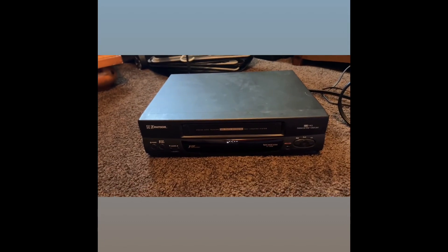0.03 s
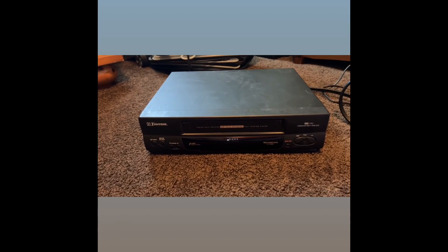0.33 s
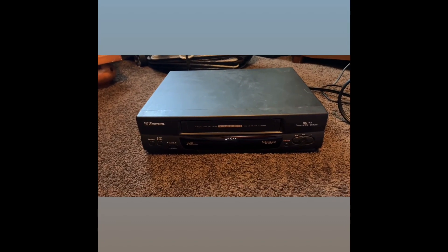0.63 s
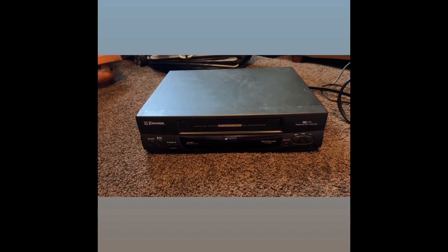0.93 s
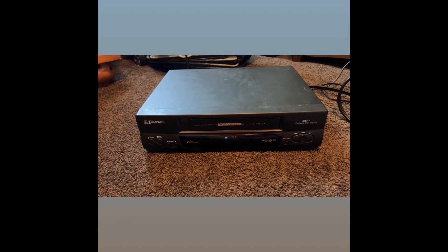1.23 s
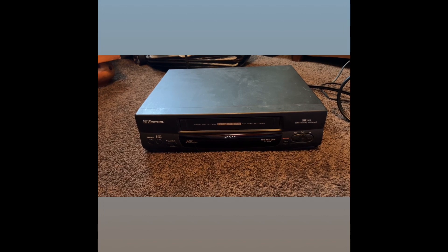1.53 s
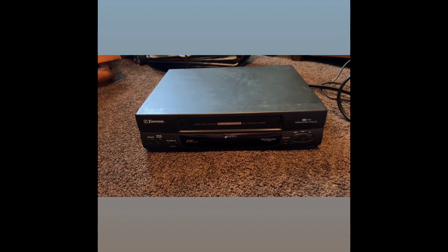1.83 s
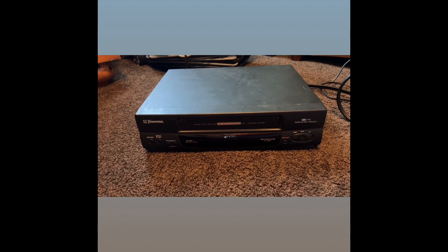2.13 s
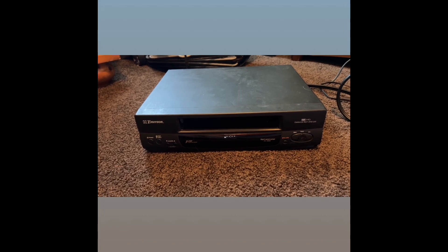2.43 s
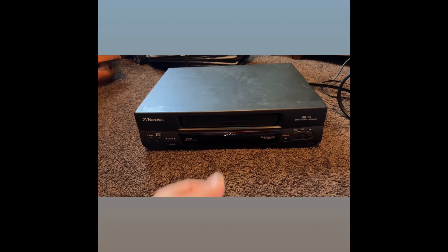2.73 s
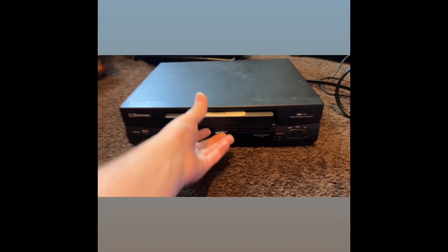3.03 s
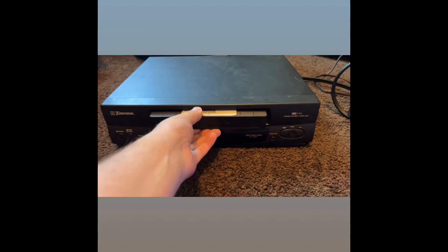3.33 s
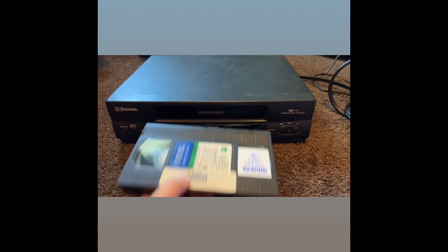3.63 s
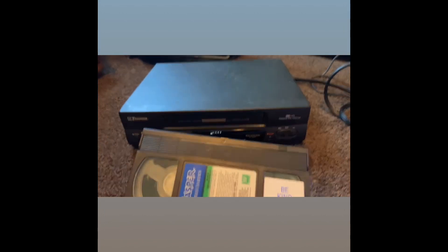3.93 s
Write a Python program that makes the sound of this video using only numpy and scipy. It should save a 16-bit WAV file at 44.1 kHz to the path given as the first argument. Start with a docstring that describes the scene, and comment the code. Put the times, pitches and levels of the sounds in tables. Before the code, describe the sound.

A video cassette recorder clacks and whirs, ejecting a tape that is pulled out by hand.

```python
"""A quiet room: a video cassette recorder on the carpet ejects its tape.
Levers clack through the chassis, the reel winds in the slack, a geared motor lifts the cassette
and pushes it out. A hand slides it from the slot with scrapes, knocks and one squeak; the flap
slaps shut and bounces. Mains hum, bearing whirr and a picture tube's whistle run throughout."""
import sys
import numpy as np
from scipy import signal
from scipy.fft import rfft, irfft
from scipy.io import wavfile

SR = 44100
rng = np.random.default_rng(int(sys.argv[2]) if len(sys.argv) > 2 else 0)


def output_pcm(signal):
    """Save a mono or channel-first signal as 16-bit PCM at the path in sys.argv[1].

    Samples are clipped to [-1, 1] before scaling.
    """
    pcm = np.clip(np.atleast_2d(signal).T, -1, 1) * 32767
    wavfile.write(sys.argv[1], SR, np.round(pcm).astype(np.int16))


N = 176400
TIME_S = np.arange(N) / SR

# Levels are relative; spectra give shape only.
# room and idling machine, noise spectrum: f/Hz, density/dB
AIR_SPECTRUM = [(44, -17.5), (122, -2), (147, -10), (247, -11), (281, -35), (328, -16.5), (415, -32.5),
                (978, -21), (2800, -43.5), (5880, -52), (12500, -56.5), (15000, -54)]
# picture tube whistle: t/s, level/dB
WHISTLE_ENVELOPE = [(0, -60), (1.6, -67.5), (2.9, -67.5), (3.6, -61), (4, -61)]
# bearing resonances: f/Hz, width/Hz, level/dB
WHIRR_MODES = [(233, 24, -74), (328, 75, -75.5), (1040, 225, -73.5), (1470, 760, -74.5)]
# gear noise under motor load: t/s, level/dB
GEAR_ENVELOPE = [(0, -65), (.22, -59.5), (.4, -57.5), (.52, -57.5), (.64, -69), (.72, -100), (1.95, -100),
                 (2.05, -65), (2.19, -64), (2.23, -58), (2.32, -56.5), (2.42, -44.5), (2.49, -53.5),
                 (2.6, -59), (2.72, -57), (2.91, -48), (2.96, -65), (3.02, -100)]
# gear noise spectrum: f/Hz, density/dB
GEAR_SPECTRUM = [(76, -27), (130, 5), (193, -0.5), (312, -1.5), (637, -3.5), (1030, -8.5), (1620, -18),
                 (4000, -18), (9000, -21.5), (15000, -24)]
# gear train resonances: f/Hz, boost/dB
GEAR_MODES = [(3210, 7), (4570, -7), (6330, -10), (7690, -4)]
# edges of the body, middle, crack and treble bands: f/Hz
CHATTER_EDGES_HZ = [150, 700, 2000, 6000, 14500]
# lever and carriage blows:
# t/s, thump/dB, body/dB, middle/dB, crack/dB, treble/dB, chatter T60/s, part f/Hz, part level/dB
LEVER_CLACKS = [(0.113, -65, -69, -59, -52.5, -55.5, 0.25, 3000, -60),
                (0.170, -62, -55.5, -61, -52.5, -49.5, 0.16, 5500, -52),
                (0.256, -64, -50, -51.5, -53, -50.5, 0.17, 2300, -49),
                (0.273, -68, -51, -52.5, -51.5, -58, 0.21, 3000, -63),
                (0.339, -62, -50, -49.5, -50.5, -61, 0.24, 1370, -73),
                (0.36, -63.5, -51, -50, -49, -59, 0.13, 1850, -53),
                (0.432, -75, -56.5, -54.5, -56.5, -66, 0.39, 3240, -70),
                (0.451, -68, -52.5, -52, -50, -57, 0.15, 3450, -67),
                (2.249, -75, -44.5, -46, -46, -50, 0.13, 5330, -45.5),
                (2.34, -73, -49, -49, -54, -76, 0.12, 1820, -58),
                (2.36, -63, -48, -62, -55, -60, 0.27, 2000, -56),
                (2.442, -58, -47.5, -50.5, -44, -39, 0.25, 5770, -42),
                (2.499, -55.5, -46.5, -42.5, -41, -41, 0.23, 2800, -44),
                (2.514, -58, -41.5, -40.5, -37.5, -41.5, 0.15, 2100, -33.5),
                (2.643, -58, -50.5, -48, -46.5, -52.5, 0.12, 3070, -44),
                (2.888, -66, -57, -56, -47.5, -50, 0.14, 4220, -61),
                (2.911, -55.5, -49, -55, -56, -56, 0.16, 3650, -68)]
# chassis and lid resonances: f/Hz, boost/dB
CHASSIS_MODES = [(190, 0.5), (395, 2), (520, -9.5), (820, 2.5), (935, -0.5), (1390, 2), (1880, 4),
                 (2330, -0.5), (2830, 6), (3380, 2), (5700, -4)]
# tape rubbing over the guides: t/s, level/dB
REEL_ENVELOPE = [(.6, -100), (.76, -76), (1.15, -86), (1.53, -83), (1.64, -68.5), (1.98, -71),
                 (2.15, -66.5), (2.9, -54), (3.0, -100)]
# tape friction spectrum: f/Hz, density/dB
TAPE_SPECTRUM = [(300, 17.5), (700, 4.5), (2500, 4.5), (7200, 4), (9000, -5), (14000, -6)]
# shell friction in slot and hand: t/s, level/dB
SCRAPE_ENVELOPE = [(3.02, -100), (3.055, -65.5), (3.13, -83), (3.335, -66), (3.4, -41), (3.435, -39.5),
                   (3.485, -45.5), (3.56, -38), (3.64, -48), (3.73, -47), (3.8, -55), (3.88, -66),
                   (4, -59.5)]
# shell friction spectrum: f/Hz, density/dB
SCRAPE_SPECTRUM = [(59, -9), (100, -7.5), (285, -8.5), (582, -1.5), (1190, -8.5), (1430, -8.5),
                   (2420, -10.5), (3840, -12.5), (15000, -22.5)]
# cassette and flap blows: columns of LEVER_CLACKS, then hollow f/Hz, hollow level/dB
SLOT_KNOCKS = [(3.154, -66, -60, -60, -66, -73, 0.052, 1390, -67.5, 390, -64),
               (3.168, -67, -59, -75, -64.5, -76, 0.19, 3030, -61, 225, -56),
               (3.441, -67, -55, -39, -42.5, -51, 0.051, 2950, -45.5, 613, -40),
               (3.542, -78, -46, -63, -46, -43, 0.23, 2560, -36.5, 517, -26.5),
               (3.587, -35.5, -29, -24, -27.5, -23, 0.097, 3900, -34, 567, -22),
               (3.598, -37.5, -34, -48, -28, -27.5, 0.11, 2200, -40, 401, -25.5),
               (3.671, -40.5, -40, -36, -35.5, -30.5, 0.14, 2480, -35, 451, -25.5)]
# cassette and flap resonances: f/Hz, boost/dB
CASSETTE_MODES = [(172, 4), (305, 3), (402, 5.5), (571, 0), (824, 3.5), (1380, 2), (2185, -2), (2840, 8.5),
                  (3340, 3.5), (3910, 2.5), (4300, -1), (8070, 1)]
# room decay: f/Hz, T60/s
ROOM_DECAY = [(100, 0.74), (1000, 0.39), (4000, 0.31), (12000, 0.4)]


def from_db(db):
    """Decibels to gain."""
    return 10 ** (np.asarray(db) / 20)


def unit_rms(x):
    """Scale to unit power."""
    return x / np.sqrt(np.mean(x ** 2) + 1e-20)


def envelope(points):
    """Gain over time from t/s, level/dB points."""
    return from_db(np.interp(TIME_S, *np.transpose(points)))


def at_hz(points, hz):
    """Read a table on a log-frequency axis."""
    points_hz, values = np.transpose(points)
    return np.interp(np.log(hz), np.log(points_hz), values)


def band(x, low_hz, high_hz):
    """Causal band-pass."""
    return signal.sosfilt(signal.butter(3, [low_hz, high_hz], "band", fs=SR, output="sos"), x)


def colour(x, spectrum):
    """Apply a spectrum, rolled off below its first point; unit power."""
    hz = np.maximum(np.arange(N // 2 + 1) * SR / N, 1)
    low_cut = 1 / np.sqrt(1 + (spectrum[0][0] / hz) ** 8)
    return unit_rms(irfft(rfft(x) * from_db(at_hz(spectrum, hz)) * low_cut, N))


def drift(rate_hz):
    """Random wander between unit-spread points."""
    return np.interp(TIME_S * rate_hz, np.arange(1000), rng.standard_normal(1000))


def grains(per_s, spread_db, size=N):
    """Tiny random contacts of uneven strength; unit power."""
    strength = from_db(spread_db * np.minimum(rng.exponential(1, size), 4)) * rng.choice([-1, 1], size)
    return unit_rms(strength * (rng.random(size) < per_s / SR))


def resonance(x, hz, width_hz):
    """Two-pole resonator, peak gain 1."""
    radius = np.exp(-np.pi * width_hz / SR)
    feedback = [1, -2 * radius * np.cos(2 * np.pi * hz / SR), radius ** 2]
    return signal.lfilter((1 - radius ** 2) / 2 * np.array([1, 0, -1]), feedback, x + 1e-18)


def ringing(x, modes, width_hz):
    """Direct sound plus a body's resonances."""
    return x + sum(from_db(db) * resonance(x, hz, width_hz) for hz, db in modes)


def damped_mode(t, hz, rise_s):
    """A mode that swells and dies within a few cycles."""
    return (t / rise_s * np.exp(1 - t / rise_s)) ** 2 * np.sin(2 * np.pi * hz * t)


def room_air():
    """Soft rumble of room and idling machine."""
    return from_db(-61.5) * colour(rng.standard_normal(N), AIR_SPECTRUM)


def mains_hum(hz=120.4, rms_db=-63):
    """One low tone, wavering slightly in level."""
    return np.sqrt(2) * from_db(rms_db + 0.94 * drift(6)) * np.sin(2 * np.pi * hz * TIME_S)


def tube_whistle(hz=15735, tremolo_hz=11.7, wander_db=1.5):
    """A thin, high picture tube whistle, with a tremolo added to its level."""
    tremolo = (1 + 0.54 * np.cos(2 * np.pi * tremolo_hz * TIME_S)) * from_db(wander_db * drift(9))
    tone = np.sqrt(2) * np.sin(2 * np.pi * hz * TIME_S + 0.6 * drift(22))
    return envelope(WHISTLE_ENVELOPE) * tremolo * tone


def bearing_whirr():
    """Spinning bearings keep a few broad resonances ringing."""
    whirr = 0
    for hz, width_hz, db in WHIRR_MODES:
        noise = resonance(rng.standard_normal(N), hz, width_hz)
        whirr += from_db(db) * unit_rms(resonance(noise, hz, width_hz))
    return whirr


def rattle(decay_s=0.0063):
    """Loose plastic catches in short random bursts; unit power."""
    catches = np.abs(grains(per_s=49, spread_db=3.6))
    bursts = signal.lfilter([1], [1, -np.exp(-1 / (decay_s * SR))], catches + 1e-18)
    return unit_rms(bursts * rng.standard_normal(N))


def gears(teeth_per_s=197, spread_db=6, rub_db=3.5):
    """Teeth tick and rub at the motor's wavering speed; the carriage rattles."""
    teeth = np.cumsum(teeth_per_s * (1 + 0.025 * drift(14))) / SR
    strength = from_db(spread_db * np.minimum(rng.standard_normal(N), 2))
    ticks = np.diff(np.floor(teeth), prepend=0) * strength
    mesh = unit_rms(unit_rms(ticks) + from_db(rub_db) * rng.standard_normal(N))
    train = ringing(mesh + from_db(-0.5) * rattle(), GEAR_MODES, width_hz=103)
    return envelope(GEAR_ENVELOPE) * colour(train, GEAR_SPECTRUM)


def blow(start_s, thump_db, body_db, middle_db, crack_db, treble_db, t60_s, part_hz, part_db):
    """Loose parts chatter, the struck part rings briefly, the case bounces on the carpet."""
    t = TIME_S[:SR // 2]
    attack_s = 0.00089 * (t60_s / 0.08) ** 1.62  # longer chatter builds more slowly
    chatter = grains(per_s=3500, spread_db=-0.5, size=len(t))
    chatter *= from_db(-60 * t / t60_s) * (1 - np.exp(-t / attack_s))
    zones = zip(CHATTER_EDGES_HZ, CHATTER_EDGES_HZ[1:], (body_db, middle_db, crack_db, treble_db))
    voices = [(band(chatter, low_hz, high_hz), db) for low_hz, high_hz, db in zones]
    strike = chatter * from_db(-60 * t / 0.069)
    voices.append((resonance(strike, part_hz, width_hz=280), part_db))
    onset = slice(int(0.025 * SR))
    clatter = sum(from_db(db) * voice / np.std(voice[onset]) for voice, db in voices)
    thump = from_db(thump_db + 13) * damped_mode(t, hz=96, rise_s=0.0074)
    out, start = np.zeros(N + SR), int(start_s * SR)
    out[start:start + len(t)] = clatter + thump
    return out[:N]


def mechanism():
    """Levers and gears sound through the chassis."""
    clacks = from_db(-2.5) * sum(blow(*row) for row in LEVER_CLACKS)
    return ringing(clacks + gears(), CHASSIS_MODES, width_hz=74)


def reel(whine_hz=7240, whine_db=-15.5):
    """Tape hisses over the guides; the reel motor whines."""
    whine = np.sin(2 * np.pi * np.cumsum(whine_hz * (1 + 0.001 * drift(69))) / SR)
    hiss = colour(rng.standard_normal(N), TAPE_SPECTRUM)
    return envelope(REEL_ENVELOPE) * (hiss + from_db(whine_db) * whine)


def shell_scrape():
    """The shell slides in many tiny slips and rattles against the guides."""
    friction = grains(per_s=3000, spread_db=1) + from_db(-5) * rattle()
    return envelope(SCRAPE_ENVELOPE) * colour(friction, SCRAPE_SPECTRUM)


def cassette_and_flap():
    """Scrapes and knocks ring shell and flap; each knock also sounds the air in the slot."""
    knocks = 0
    for start_s, *contact, hollow_hz, hollow_db in SLOT_KNOCKS:
        hollow = damped_mode(np.maximum(TIME_S - start_s, 0), hollow_hz, rise_s=0.0044)
        knocks += blow(start_s, *contact) + from_db(hollow_db) * hollow
    return ringing(from_db(-1.5) * knocks + shell_scrape(), CASSETTE_MODES, width_hz=42)


def grip_squeak(start_s=3.287, length_s=0.054, start_hz=834, sag_hz_per_s=810):
    """The gripped cassette squeaks once, rough and falling in pitch."""
    t = np.clip(TIME_S - start_s, 0, length_s)
    hz = (start_hz - sag_hz_per_s * t) * (1 + 0.046 * drift(300))
    swell = np.sin(np.pi * np.sqrt(t / length_s))
    return from_db(-46.5) * swell * np.sin(2 * np.pi * np.cumsum(hz) / SR)


def room_reverb(x, onset_s=0.012):
    """Diffuse small-room tail, longest in the bass."""
    t, edges_hz, tail = TIME_S[:SR], np.geomspace(45, 18000, 10), 0
    for low_hz, high_hz in zip(edges_hz, edges_hz[1:]):
        t60_s = at_hz(ROOM_DECAY, np.sqrt(low_hz * high_hz))
        tail += band(rng.standard_normal(SR), low_hz, high_hz) * from_db(-60 * t / t60_s)
    tail *= 1 - np.exp(-(t / onset_s) ** 2)
    return signal.fftconvolve(x, tail / np.sqrt(np.sum(tail ** 2)))[:N]


def scene(treble_cutoff_hz=10260):
    """Mono mix; a gentle low-pass softens the top treble of clacks, gears, scrapes and knocks."""
    treble_lowpass = signal.butter(2, treble_cutoff_hz, fs=SR, output="sos")
    parts = signal.sosfilt(treble_lowpass, mechanism() + cassette_and_flap())
    machine = from_db(-3) * parts + reel() + grip_squeak()
    reverb = from_db(-17) * room_reverb(machine)
    background = bearing_whirr() + mains_hum() + tube_whistle() + room_air()
    return (machine + reverb + background)[None]


def record(dry):
    """Steep low-pass at 15.9 kHz."""
    return signal.sosfilt(signal.ellip(12, 0.1, 80, 15900, fs=SR, output="sos"), dry)


dry = scene()
out = record(dry)
output_pcm(out)
```